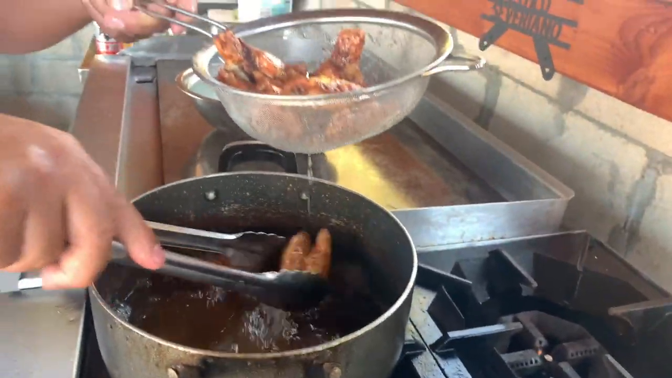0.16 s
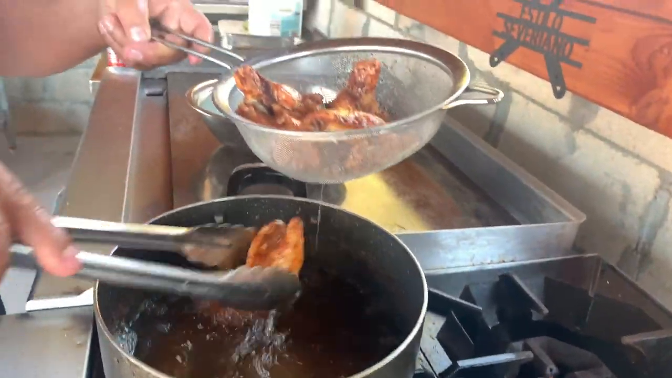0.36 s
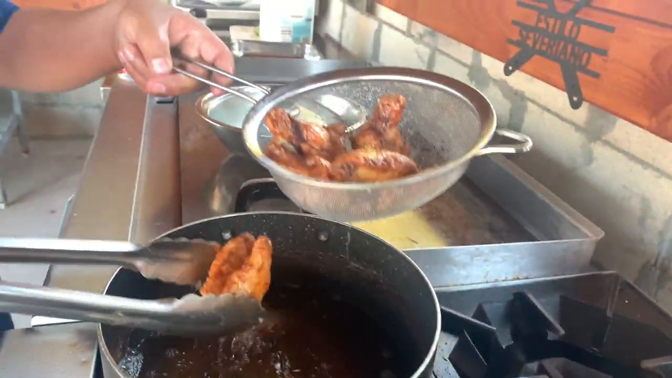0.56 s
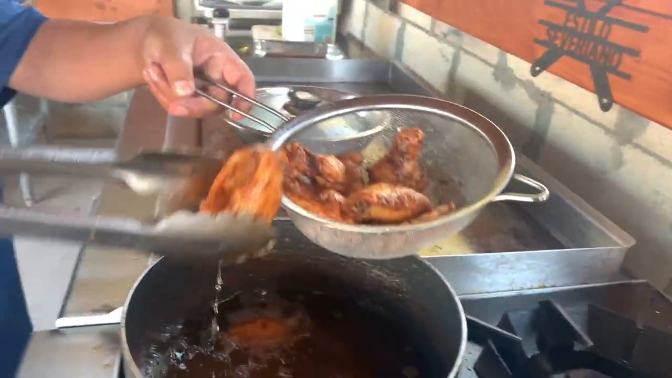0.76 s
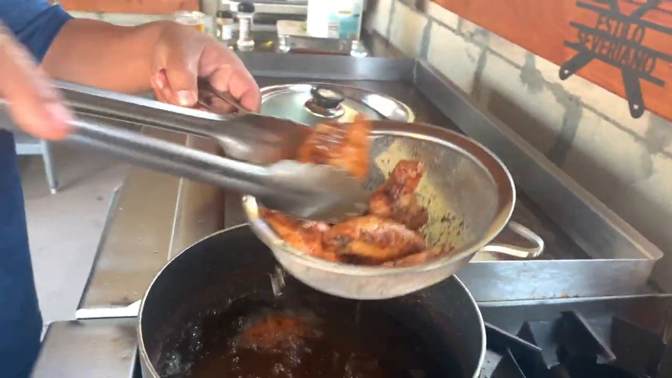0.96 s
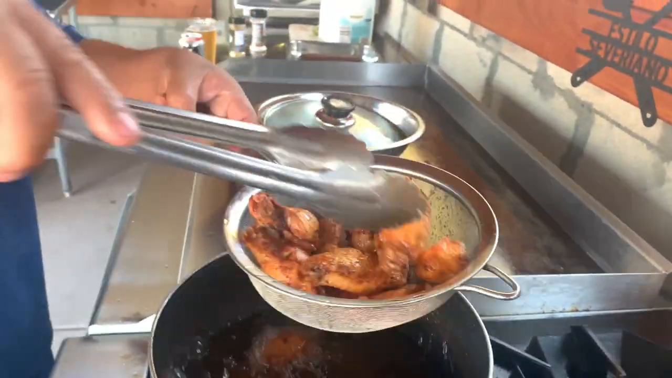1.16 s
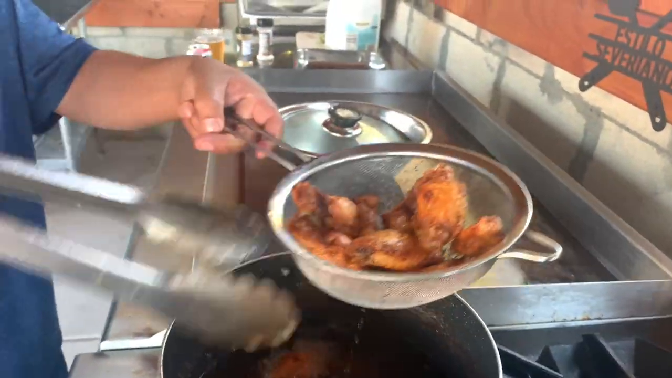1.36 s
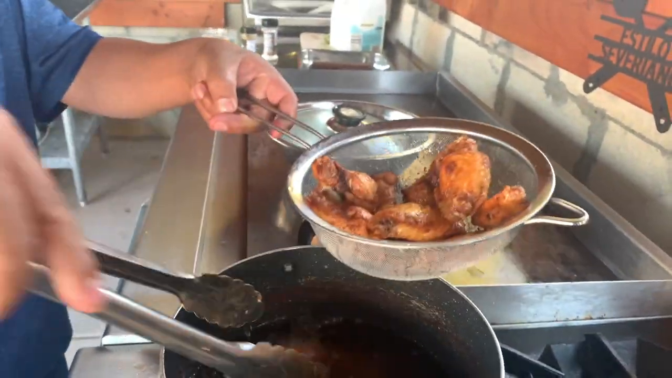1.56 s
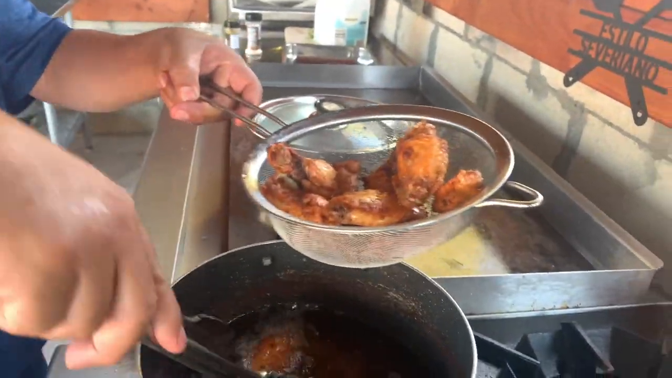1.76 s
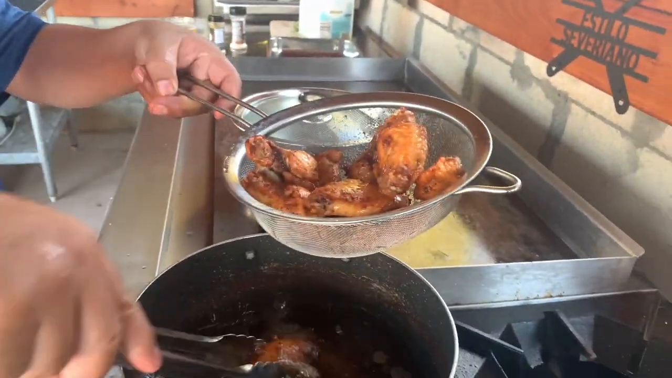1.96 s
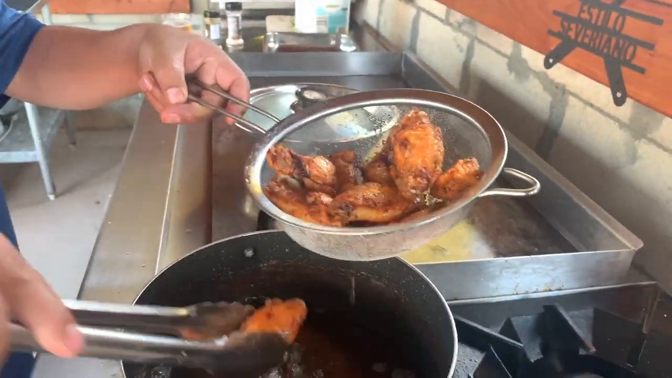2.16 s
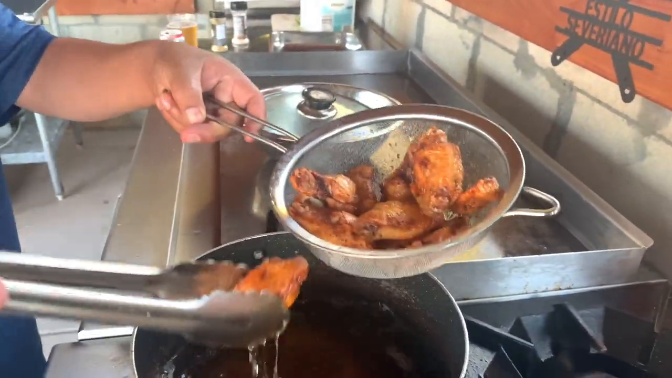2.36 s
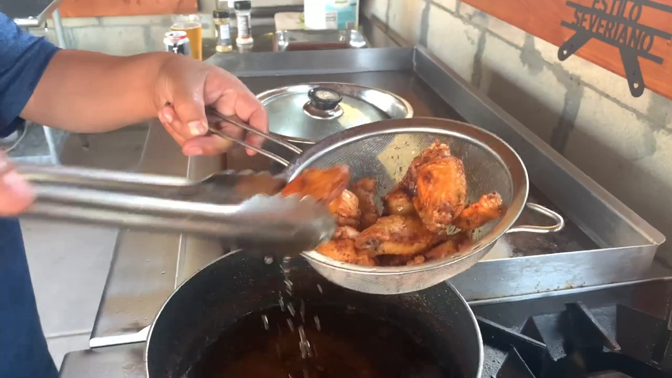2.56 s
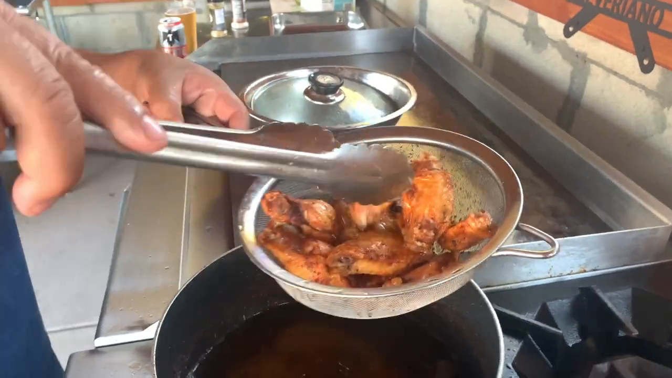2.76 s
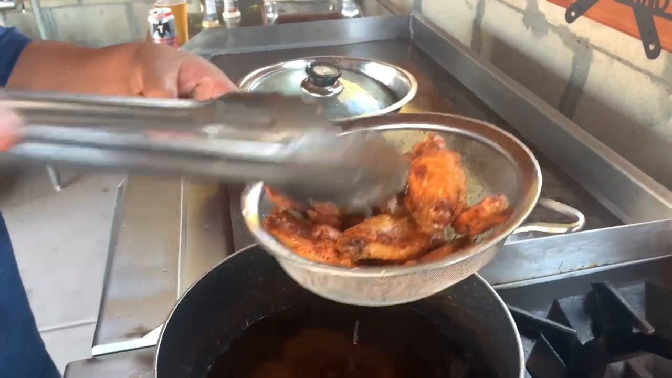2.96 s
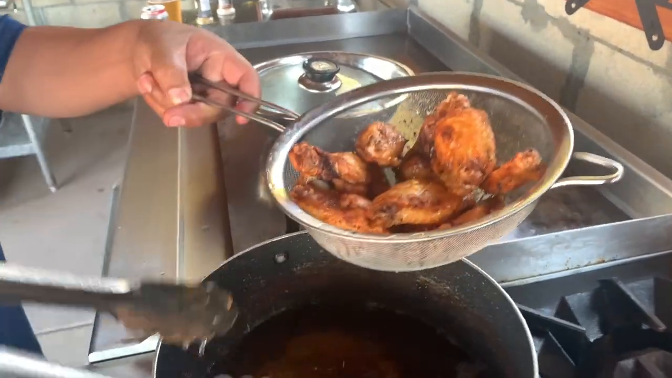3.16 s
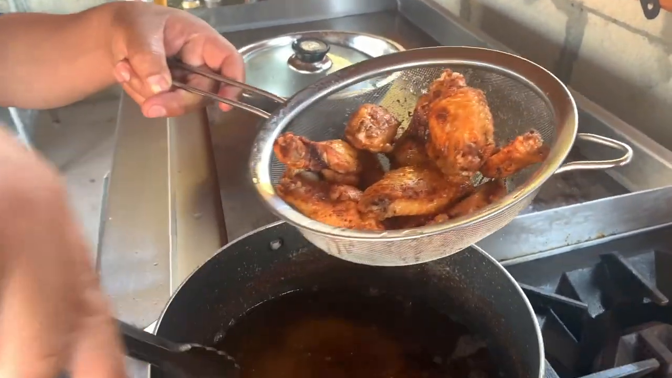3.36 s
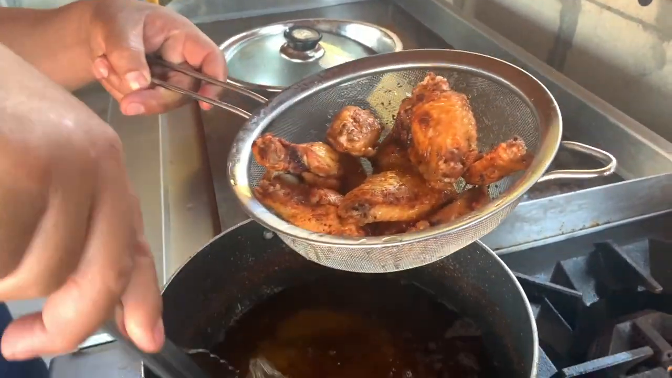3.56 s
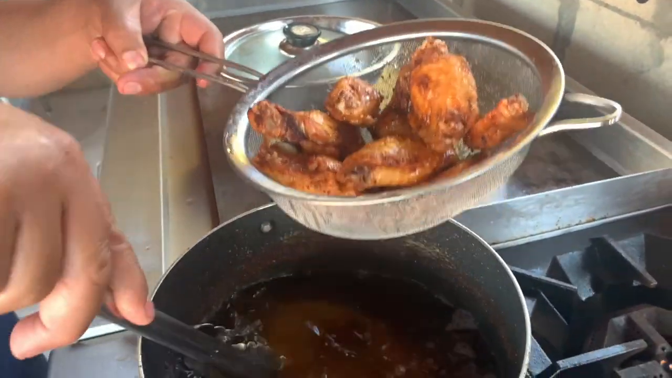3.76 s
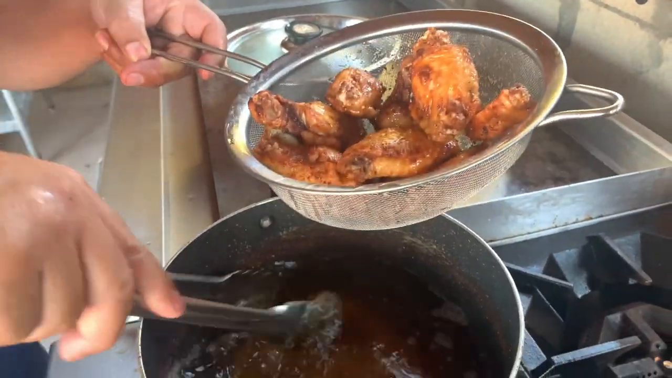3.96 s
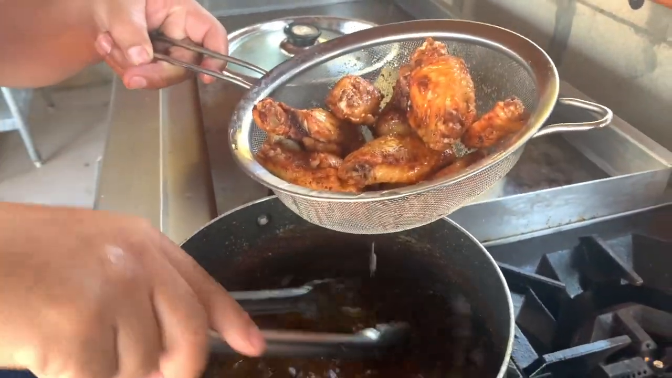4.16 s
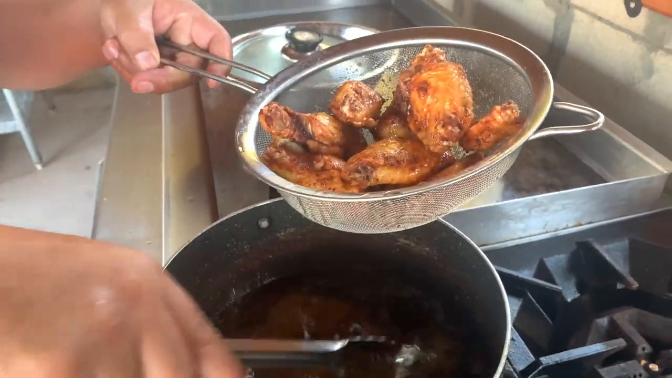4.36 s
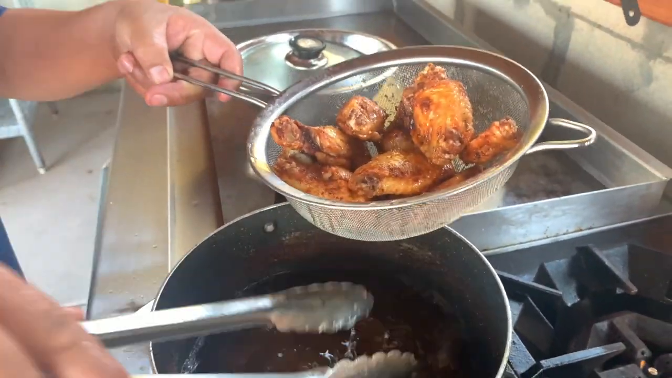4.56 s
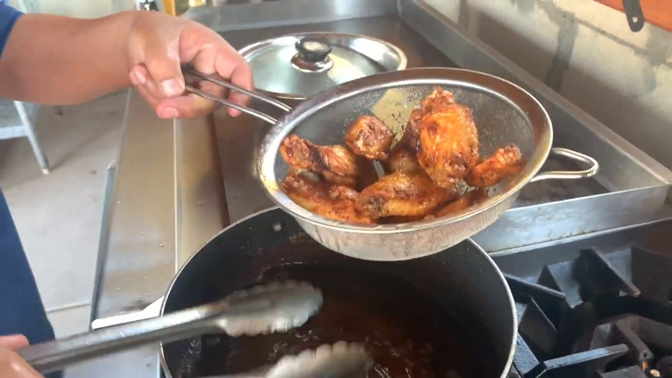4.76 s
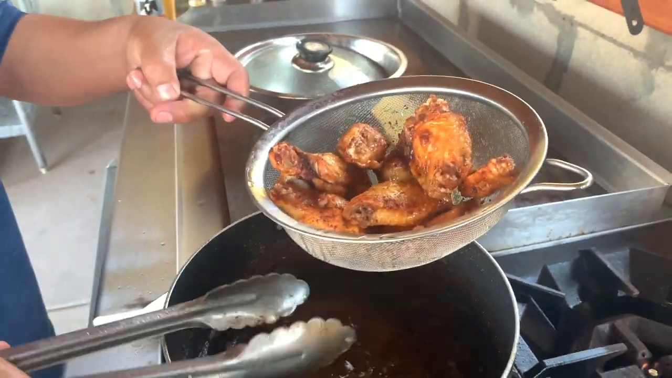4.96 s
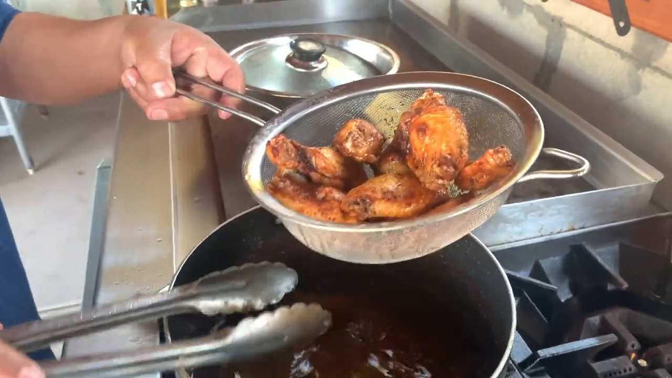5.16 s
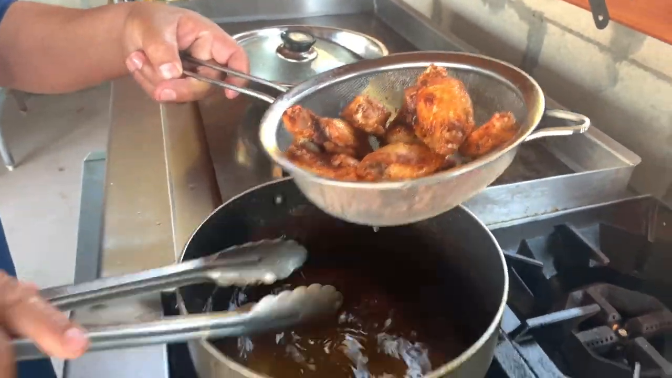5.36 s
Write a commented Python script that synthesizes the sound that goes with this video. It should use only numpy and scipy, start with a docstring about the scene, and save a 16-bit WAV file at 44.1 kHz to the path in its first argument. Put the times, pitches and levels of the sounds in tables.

```python
"""A dense, bright sizzle runs throughout: chicken wings fry in a pot of hot oil, close to two microphones.
Thousands of tiny steam pops a second make it, easing as wings leave; ringing bubbles boil up and plop,
noise bursts spit and squirt, and filtered noise slops. Steel tongs touch the pot as they fish wings out,
then knock on it four times: noise cracks and ringing modes that overload the microphones.
Behind the pot a kitchen fan drones: three wavering hum harmonics over a rumble of air."""
import sys
import numpy as np
from scipy import signal
from scipy.fft import rfft, irfft, next_fast_len
from scipy.io import wavfile

SR = 44100
rng = np.random.default_rng(int(sys.argv[2]) if len(sys.argv) > 2 else 0)


def unload_audio(sound):
    """Save the sound as a 16-bit wav file, at the path given as the first command line argument."""
    columns = np.transpose(np.atleast_2d(sound))
    # keep every value between -1 and 1, then stretch to whole-number steps
    steps = np.round(np.clip(columns, -1, 1) * 32767)
    wavfile.write(sys.argv[1], SR, steps.astype(np.int16))


N = 238928
TIME = np.arange(N) / SR
TAPS = 4096  # length of a path from pot to microphones, samples
LEAD = 64  # samples kept free ahead of a direct arrival
EDGE_HZ = 16050  # upper band limit

# Relative frying level, easing as wings leave: t/s, coarse sizzle level/dB, fine fizz level/dB
FRYING = [(0.0, -26, -33.5), (0.24, -23, -26.5), (0.72, -25.5, -32), (0.84, -23, -28), (1.11, -27.5, -30.5),
          (1.24, -26.5, -30), (1.56, -24, -35), (2.08, -23, -26.5), (2.21, -26, -28.5),
          (2.46, -22.5, -30.5), (2.58, -27.5, -32.5), (2.81, -24.5, -31), (3.08, -30, -33.5),
          (3.56, -22.5, -30.5), (4.18, -24, -29.5), (5.41, -28.5, -43.5)]
# Dips and small lifts of the coarse sizzle while the fizz goes on: t/s, level change/dB
LULLS = [(0.331, -8), (1.185, -1), (1.685, -7), (2.27, -2.5), (2.326, -22.5), (2.555, -5.5), (2.92, 1),
         (3.189, -2)]
# Colour of the pops in the pot: f/Hz, spectral density/dB per Hz
SIZZLE_COLOUR = [(250, -47), (380, -14.5), (480, -12.5), (700, -19), (930, -14), (1200, -4.5), (1400, -6),
                 (1800, -8), (2200, -3), (2600, -4.5), (2930, -2), (3200, -0.5), (3520, -1.5), (4300, -6),
                 (5900, -6.5), (7200, 0), (10000, -3), (12000, -5), (15700, -12)]
# Short rushes of bubbles as the oil boils up: t/s at the height, level/dB, half length/s
BOILS = [(0.56, -38, 0.03), (1.107, -30.5, 0.036), (1.44, -27.5, 0.1), (2.133, -24, 0.026),
         (2.397, -33, 0.016), (3.259, -26, 0.022), (3.749, -18, 0.017), (4.137, -21.5, 0.04),
         (4.34, -26.5, 0.036), (5.045, -24, 0.035)]
# Hollow of the pot, rung by small bubbles: f/Hz, gain/dB
HOLLOW = [(500, -16), (800, 3), (1000, -5), (1230, -1.5), (1520, -4.5), (1900, 2), (2500, -3), (3600, -4)]
# Large bubbles: t/s, peak level/dB, f/Hz, droplet spray peak level/dB, relative gulp level/dB
BUBBLES = [(0.005, -16.5, 1350, -19, -45), (0.062, -16, 860, -11.5, -28.5), (0.099, -24, 3010, -13, -43),
           (0.148, -21.5, 970, -17, -39), (0.183, -14.5, 1170, -13, -37.5), (0.212, -21, 2900, -25, -65),
           (0.307, -29, 2930, -39, -57), (0.358, -22.5, 1020, -21, -50), (0.386, -16, 1790, -17, -46),
           (0.478, -23, 1950, -28, -57), (0.533, -30, 1000, -16, -40.5), (0.559, -20, 745, -22, -54),
           (0.638, -19, 2240, -11, -37), (0.666, -13, 1180, -31, -41), (0.743, -20, 3570, -17, -56),
           (0.804, -23, 1464, -21, -43), (0.817, -12, 2110, -13, -54), (0.874, -16.5, 1150, -14, -34),
           (0.945, -13, 1250, -17, -43), (0.963, -13, 3490, -24, -55), (1.009, -15, 1115, -31, -54),
           (1.045, -20, 780, -20, -47), (1.056, -18, 1300, -30, -55), (1.080, -22.5, 654, -22, -47),
           (1.154, -20.5, 1248, -24, -53), (1.206, -21, 1220, -14.5, -43), (1.215, -13, 1248, -20, -38.5),
           (1.249, -16.5, 1720, -16, -57), (1.261, -11.5, 3270, -18, -53), (1.313, -13.5, 2800, -21, -55),
           (1.316, -12, 3470, -28, -57), (1.359, -22, 3445, -20, -52), (1.414, -9, 2930, -23, -55),
           (1.433, -24, 740, -13.5, -40), (1.465, -14, 1240, -17, -41), (1.542, -12.5, 1710, -20, -54),
           (1.574, -14.5, 1270, -19, -47), (1.726, -13.5, 745, -8, -39), (1.821, -18, 1620, -18, -47),
           (1.917, -19, 3000, -17, -58), (1.934, -20, 1205, -25, -50), (1.967, -23, 1100, -22, -52),
           (2.047, -22, 1130, -32, -52), (2.08, -22, 1090, -16.5, -42), (2.432, -17, 3000, -29, -60),
           (2.466, -24, 1248, -16, -55), (2.517, -17.5, 1593, -21, -51), (2.585, -16.5, 1800, -30, -55),
           (2.635, -19.5, 1220, -19, -60), (2.668, -19, 1722, -16.5, -60), (2.716, -23.5, 1076, -14, -52),
           (2.771, -12, 2250, -14.5, -62), (2.819, -28, 1230, -13, -58), (2.833, -12.5, 1220, -11, -63),
           (2.943, -9.5, 3150, -23, -66), (2.969, -24, 1160, -18.5, -65), (3.036, -27, 1170, -15, -58),
           (3.036, -14, 4000, -24, -62), (3.101, -13.5, 2800, -35, -64), (3.191, -15, 3800, -36, -64),
           (3.216, -15, 1135, -13, -39.5), (3.42, -20, 880, -17, -46), (3.432, -19, 764, -31, -41),
           (3.490, -9, 1270, -12, -53), (3.514, -12, 1140, -30, -50), (3.558, -8.5, 3160, -27, -57),
           (3.603, -9, 883, -10, -41), (3.689, -24, 1800, -20, -60), (3.712, -16.5, 1240, -20, -44),
           (3.792, -24, 3010, -28, -39), (3.852, -11, 1190, -25, -57), (3.867, -19, 1200, -26, -55),
           (3.939, -10.5, 1378, -11, -53), (3.965, -15.5, 1076, -34, -56), (4.036, -11.5, 2630, -20, -55),
           (4.074, -11, 1600, -21, -60), (4.154, -15, 1650, -14, -53), (4.173, -19, 1220, -20, -60),
           (4.199, -10, 1950, -14, -42), (4.215, -20, 1150, -28, -47), (4.331, -26, 2710, -18, -60),
           (4.38, -15, 1120, -17, -46), (4.415, -11.5, 2480, -30, -61), (4.567, -17.5, 1205, -21, -55),
           (4.568, -10.5, 2050, -16.5, -57), (4.697, -10.5, 2300, -22, -42), (4.977, -17, 1200, -23, -43),
           (5.138, -19, 1417, -24, -37), (5.214, -22.5, 1027, -25, -44)]
# Puff of air in the pot: f/Hz, spectral density/dB per Hz
GULP_COLOUR = [(200, -5), (330, -21), (460, -5), (560, 2.5), (800, 11.5), (1200, -43), (2500, -17)]
# Loudest spitting drops: t/s, relative level/dB, f/Hz
SPITS = [(0.034, -14, 6490), (0.224, 0, 10700), (0.726, 0, 9900), (0.841, -4, 7300), (0.898, -11, 11200),
         (0.9193, -10, 5950), (1.098, -8.5, 10400), (1.1173, -12, 10700), (1.203, -0.5, 9900),
         (1.2236, -3, 6930), (1.434, 3, 11300), (1.573, -1, 7550), (1.6376, -4.5, 9500), (1.674, 0.5, 7600),
         (1.8357, -3.5, 6760), (1.850, -4, 10300), (1.9465, 1.5, 7700), (2.007, -4, 10400),
         (2.265, -7, 11200), (2.506, -9, 10800), (2.6377, -3.5, 7700), (2.722, -8.5, 6660),
         (2.81, -10, 6460), (3.151, -11, 5900), (3.312, -9, 5200), (3.405, -16, 6960), (3.554, -10, 6800),
         (3.829, -14, 7340), (3.9263, -4, 5830), (3.942, -3, 6540), (4.0335, -4, 6550), (4.132, -1, 10000),
         (4.299, -8, 9900), (4.399, -1, 7600), (4.5444, -5.5, 9400), (4.627, -11, 9250)]
# Steam squirts, each lower, as the tongs plunge in: t/s, peak level/dB, f/Hz, 60 dB decay/s
SQUIRTS = [(1.758, -3, 5260, 0.062), (1.7755, -8, 4550, 0.013), (1.787, -6.5, 3430, 0.069)]
# Tongs against the pot: t/s, force level/dB, rattle length/s, relative boom level/dB,
# favoured f/Hz at the struck spot, ringing time as a share of the free one
KNOCKS = [(1.726, -24.5, 0.0086, -41.5, 2950, 1.1), (3.214, -21.5, 0.039, -42, 1030, 1.1),
          (3.311, -20, 0.0071, -37, 2850, 0.71), (3.488, -29, 0.0087, -39, 2300, 0.81),
          (3.851, -13, 0.0026, -31, 7400, 0.96), (3.941, -34, .004, -38.5, 1200, 1),
          (4.6381, -6.5, 0.0055, -30.5, 3241, 0.98), (4.66, -19, 0.005, -36.5, 1040, 0.48),
          (4.8457, -19, 0.0033, -53, 4490, 0.65), (4.8507, -7, 0.0057, -27.5, 4430, 0.66),
          (5.049, -21, 0.0026, -55, 5070, 0.44), (5.0544, -6, 0.012, -28, 6700, 0.6),
          (5.305, -19, 0.0035, -55, 5140, 0.57), (5.3132, -6.5, 0.013, -31, 3550, 0.74)]
# Modes of tongs and pot before each blow varies them: f/Hz, relative level/dB, free 60 dB decay/s
STEEL_MODES = [(524, -3, 0.26), (914, -3, 0.6), (1020, 7.5, 0.4), (1195, 15.5, 0.14), (1800, 4, 0.089),
               (1860, 9, 0.17), (2300, 2, 0.38), (2924, 18, 0.079), (3210, 14.5, 0.15), (3510, 5.5, 0.076),
               (3440, 15, .12), (4115, -5, 0.12), (4520, 16, 0.12), (5150, 0, 0.12), (5000, 14, 0.09),
               (5400, 9, 0.2), (5560, 10, 0.12), (5940, 11, 0.15), (6200, -27, 0.12), (6288, 12, .11),
               (6585, 6, 0.1), (6740, 11, 0.13), (7450, 6, 0.14)]
# Colour of a steel contact: f/Hz, spectral density/dB per Hz
CLACK_COLOUR = [(40, -41), (150, -10), (300, -16), (440, -5.5), (520, -2), (680, -5.5), (950, -0.5),
                (1400, -2.5), (1800, 1), (2400, -4), (5200, -0.5), (8000, -0.5), (10500, -4.5),
                (12500, -22), (15500, -17)]
# First touch of steel: f/Hz, spectral density/dB per Hz
TICK_COLOUR = [(800, -31), (2500, 1.5), (5000, -0.5), (9000, -5.5), (11500, -3), (15500, -14)]
# Boom of the full pot on its grate: f/Hz, spectral density/dB per Hz
BOOM_COLOUR = [(40, -35), (85, -16), (112, 6.5), (130, -13), (150, 6.5), (170, -25), (192, 6), (207, 0),
               (228, 4.5), (255, 0.5), (295, -6.5), (400, -6.5), (700, -33.5)]
# Tongs and wings bump the pot bottom under the oil: t/s, relative level/dB
THUDS = [(1.728, -30), (1.768, -30), (1.797, -28.5), (2.582, -41), (3.215, -36), (3.256, -39),
         (3.795, -30.5), (3.893, -31.5)]
# Dull bump through the oil: f/Hz, spectral density/dB per Hz
THUD_COLOUR = [(90, -20), (170, -4.5), (240, 1), (320, -5), (420, -9), (700, -25), (1500, -45)]
# Stirred oil slopping about in the pot: start t/s, length/s, level/dB
SLOPS = [(0.0, 2.245, -39), (2.38, 0.67, -47), (3.222, 1.08, -37), (4.15, 0.48, -40), (4.62, 1.06, -34)]
# Colour of the slopping oil: f/Hz, spectral density/dB per Hz
SLOP_COLOUR = [(170, -20), (240, 6), (280, -10.5), (330, 1.5), (385, -6), (450, -13), (550, 0.5), (630, -5),
               (750, 5.5), (1000, -29), (1500, -16)]
# Motor hum swelling and sinking: t/s, relative fundamental level/dB
FAN_HUM = [(0.0, -37.5), (0.25, -35.5), (0.7, -39), (1.0, -34), (1.3, -42.5), (1.47, -53), (1.71, -36.5),
           (1.84, -32), (2.27, -50.5), (2.45, -39), (2.62, -50.5), (2.88, -42), (3.1, -33.5), (3.35, -28.5),
           (3.58, -43), (3.78, -29), (3.97, -33), (4.07, -40), (4.26, -26.5), (4.44, -41.5), (4.55, -31),
           (5.41, -34.5)]
# Second harmonic of the hum before its waver: t/s, level/dB
FAN_OCTAVE = [(0.0, -52), (0.3, -42.5), (0.72, -52), (0.95, -39), (1.15, -50.5), (1.3, -38), (1.55, -40),
              (1.7, -56), (2.0, -51), (2.3, -73), (2.45, -58), (2.65, -42), (2.9, -59), (3.1, -45),
              (3.4, -41), (5.41, -47)]
# Moving air of the fan: f/Hz, spectral density/dB per Hz
AIR_COLOUR = [(20, -22), (35, -2.5), (55, 10.5), (80, 9), (120, 3.5), (200, -10.5), (300, -6), (600, -30),
              (1500, -56)]
# The pot at the two microphones: f/Hz, likeness 0-1, phase by which left leads/rad
MICROPHONES = [(70, 0.97, 0), (155, 0.95, 0.8), (230, 0.95, 1.9), (300, 0.9, 3.1), (385, 0.85, 4.3),
               (440, 0.5, 4.6), (480, 0.24, 0.4), (590, 0.7, 2.2), (740, 0.37, 2.7), (830, 0.54, 0.7),
               (1200, 0.92, 1.9), (1850, 0.15, 2.6), (2900, 0.66, 3.4), (4000, 0.1, 4.3), (5200, 0.3, 2.0),
               (6300, 0.6, -0.2), (8400, 0.96, -3.1), (9700, 0.7, -4.6), (11000, 0.96, -6.3),
               (12100, 0.62, -7.5), (13400, 0.95, -9.4), (15300, 0.84, -12.4)]
# Balance of the two microphones: f/Hz, left minus right level/dB
BALANCE = [(250, -11), (500, -3), (1200, -0.5), (2500, -1), (4000, -2.5), (5500, -6.5), (7200, 0.5)]

LULL_SINK_S, LULL_RETURN_S = 0.028, 0.017
POPS_PER_S, FINER_IS_DENSER = 170, .8  # pop rate at 1500 Hz, and its exponent over pitch
FLURRY_DB, FLURRY_HZ, SHARED_FLURRY_DB = 4.2, 70, 1.6
POP_ECHO_S = .03
SIMMER_DB = -9.5  # bubbling between the boils, relative to the coarse sizzle
BUBBLE_CYCLES, BUBBLE_RISE, BUBBLE_ECHO_DB = 4.0, .005, -2.5  # cycles at 1200 Hz
SMALL_RING_LONGER = .6  # exponent of the ringing cycles over pitch
SPRAY_T60_S = .1
FIZZLE_DB = -13  # relative to the coarse sizzle
SPIT_S, SPIT_OCTAVES, SPIT_ECHO_S = 0.0004, 0.41, 0.011  # level reference time, bandwidth, echo decay
SQUIRT_OCTAVES = .36
TICK_DB, RING_DB = -5, -6.3  # relative to the body of a clack
TICK_T60_S, BODY_RISE_S = 0.051, 0.0026  # the rattle lengthens the tick
FAVOUR_DB, FAVOUR_OCTAVES = 8, .04
MODE_SPREAD_DB, MODE_DETUNE = 2, .002  # random spread of level, and of pitch as a share
THUD_T60_S, THUD_RISE_S = 0.17, 0.0028
SLOP_EDGE_S, SLOP_WASH = 0.13, 0.12  # fade at each end, steady power under the glugs
GLUGS_PER_S, GLUG_S = 45, .007
FAN_HZ, FAN_WAVER_DB, FAN_WAVER_HZ = 78.2, 1.0, 4


def amp(db):
    """Decibels to gain."""
    return 10 ** (np.asarray(db) / 20)


def evened(x):
    """Scales to rms 1."""
    return x / np.sqrt(np.mean(x ** 2) + 1e-20)


def read(table, hz, axis=1):
    """One column of a table over log frequency."""
    rows = np.array(table, float)
    return np.interp(np.log(hz + 1), np.log(rows[:, 0] + 1), rows[:, axis])


def follow(table, axis=1):
    """One column of a table over time."""
    rows = np.array(table, float)
    return np.interp(TIME, rows[:, 0], rows[:, axis])


def add(mix, s, sound):
    """Mixes in a stereo sound at time s, less the lead ahead of its direct arrival."""
    part = mix[:, max(round(s * SR) - LEAD, 0):][:, :sound.shape[1]]
    part += sound[:, :part.shape[1]]


def through(x, response):
    """Convolves a mono sound with a stereo response."""
    return signal.fftconvolve(response, x[None], axes=1)


def colour(x, spectrum):
    """Filters by a smooth spectrum."""
    size = next_fast_len(x.shape[-1] + TAPS)
    gain = amp(read(spectrum, np.fft.rfftfreq(size, 1 / SR)))
    return irfft(rfft(x, size) * gain, size)[..., :x.shape[-1]]


def drift(hz):
    """Slow chance of rms 1 that turns about hz times a second."""
    knots = rng.standard_normal(2048)
    return evened(np.interp(TIME * hz, np.arange(len(knots)), knots))


def train(per_s, spread_db, largest):
    """Random clicks of either sign, most small and a few large."""
    out = np.zeros(N)
    at = np.flatnonzero(rng.random(N) < per_s / SR)
    sizes, signs = rng.exponential(1, 20000), rng.choice([-1., 1.], 20000)
    out[at] = (amp(spread_db * np.minimum(sizes, largest)) * signs)[:len(at)]
    return out


def spurts_of(clicks, decay_s):
    """Lets each click die away exponentially."""
    return signal.lfilter([1], [1, -np.exp(-1 / (decay_s * SR))], clicks)


def path(t60, directness=1):
    """From one spot in the pot to both microphones: a direct arrival plus echoes off the pot wall."""
    hz, t = np.fft.rfftfreq(TAPS, 1 / SR), np.arange(TAPS) / SR
    echoes = rng.standard_normal((2, TAPS)) * amp(-60 * t / t60)
    echoes = rfft(echoes / np.linalg.norm(echoes, axis=1, keepdims=True))
    same = np.clip(directness * read(MICROPHONES, hz), 0, .99)
    side = np.array([[.5], [-.5]])  # left, right
    direct = np.exp(1j * side * read(MICROPHONES, hz, axis=2))
    both = np.sqrt(same) * direct + np.sqrt(1 - same) * echoes
    both = both * amp(side * read(BALANCE, hz))
    fade = np.minimum(2 * (1 - t / t[-1]), 1) ** 2
    return np.roll(irfft(both), LEAD, axis=1) * fade


def ports(x):
    """A low sound reaches both microphones alike, a little apart in phase."""
    size = next_fast_len(len(x) + TAPS)
    phase = read(MICROPHONES, np.fft.rfftfreq(size, 1 / SR), axis=2)
    return irfft(rfft(x, size) * np.exp(.5j * np.array([phase, -phase])), size)[:, :len(x)]


def pop(hz, octaves, t60):
    """A burst of steam: one click, strongest around hz, heard from its own spot."""
    distance = np.log2((np.fft.rfftfreq(TAPS, 1 / SR) + 1) / hz) / octaves
    return irfft(rfft(path(t60)) * np.exp(-distance ** 2 / 2))


def blip(hz, cycles, rise):
    """A bubble rings, decaying over some cycles while its pitch rises."""
    turns = hz * np.arange(TAPS // 2) / SR
    age = np.minimum(turns / cycles, 5)
    tone = np.sin(2 * np.pi * np.cumsum(1 + rise * age) * hz / SR)
    return tone * np.exp(-turns / cycles) * (1 - np.exp(-turns))


def coarse_db():
    """Relative level of the coarse sizzle: the frying plus its lulls, which sink and return quickly."""
    lulls_db = 0
    for s, db in LULLS:
        pace = np.where(TIME < s, LULL_SINK_S, LULL_RETURN_S)
        lulls_db = lulls_db + db * np.exp(-abs(TIME - s) / pace)
    return follow(FRYING) + lulls_db


def sizzle(count=28):
    """Thousands of pops a second in shared and separate flurries; the finest pitches follow the fizz."""
    body_db, fine_db = coarse_db(), follow(FRYING, axis=2)
    out, shared_db = np.zeros((2, N)), SHARED_FLURRY_DB * drift(FLURRY_HZ)
    for hz in np.geomspace(380, 16000, count):
        fineness = np.clip(2 * np.log2(hz / 5800), 0, 1)
        level_db = (1 - fineness) * (body_db - 1.06) + fineness * (fine_db + 0.5)
        flurry_db = shared_db + FLURRY_DB * np.tanh(drift(FLURRY_HZ))
        per_s = min(POPS_PER_S * (hz / 1500) ** FINER_IS_DENSER, 3000)
        clicks = evened(train(per_s, spread_db=4.6, largest=2.9)) * amp(level_db + flurry_db)
        voice = pop(hz, octaves=0.28 * (hz / 3000) ** -.35, t60=POP_ECHO_S)
        out += signal.oaconvolve(clicks[None], voice, axes=1)[:, LEAD:N + LEAD]
    return amp(6.0) * colour(out, SIZZLE_COLOUR)


def simmer(count=24):
    """Steam escapes in spurts: small bubbles, louder in each spurt, ring the hollow of the pot."""
    spurts = spurts_of(abs(train(36, spread_db=2.5, largest=2.5)), 0.003)
    crowd, out = 0.8 + np.minimum(spurts, 1.2), np.zeros((2, N))
    for hz in np.geomspace(1020, 4400, count):
        voice = through(blip(hz, cycles=7.3, rise=0.057), path(0.087))
        clicks = crowd * train(34, spread_db=4.5, largest=2.64)
        out += signal.oaconvolve(clicks[None], voice, axes=1)[:, :N]
    boiling = sum(amp(db) ** 2 * np.exp(-((TIME - s) / half) ** 2) for s, db, half in BOILS)
    level = np.sqrt(amp(coarse_db() + SIMMER_DB) ** 2 + boiling)
    return evened(colour(out, HOLLOW)) * level


def bubbles():
    """Large bubbles plop where wings and tongs stir the oil, and the air in the pot gulps below them."""
    out, t = np.zeros((2, N)), np.arange(2 * TAPS) / SR
    for s, db, hz, spray_db, gulp_db in BUBBLES:
        tone = blip(hz, BUBBLE_CYCLES * (hz / 1200) ** SMALL_RING_LONGER, BUBBLE_RISE)
        echo = through(tone, path(0.14, directness=0))
        direct = ports(np.pad(tone, (LEAD, echo.shape[1] - len(tone) - LEAD)))
        plop = evened(direct) + amp(BUBBLE_ECHO_DB) * evened(echo)
        add(out, s, amp(db) * plop / abs(plop).max())
        # the torn film scatters droplets
        spray = rng.standard_normal(TAPS) * amp(-60 * t[:TAPS] / SPRAY_T60_S)
        spray = through(spray, pop(1800, octaves=0.75, t60=0.068))
        add(out, s, amp(spray_db) * spray / abs(spray).max())
        puff = evened(colour(rng.standard_normal(len(t)), GULP_COLOUR)) * amp(-60 * t / 0.072)
        hollow = amp(-9.5) * np.sin(2 * np.pi * 385 * t) * amp(-60 * t / 0.25)
        gulp = (puff + hollow) * (1 - np.exp(-t / 0.0012))
        add(out, s, amp(gulp_db + 13.0) * ports(gulp))
    return out


def fizzle(count=14):
    """Single small bubbles burst at the surface and stand out of the sizzle, on a ladder of pitches."""
    out = np.zeros((2, N))
    for hz in np.geomspace(1700, 7200, count):
        voice = through(blip(hz, cycles=2.5, rise=0.04), path(0.017))
        clicks = train(7, spread_db=4.0, largest=2.5)
        out += signal.oaconvolve(clicks[None], voice, axes=1)[:, :N]
    return amp(coarse_db() + FIZZLE_DB) * evened(out)


def spits():
    """Water drops flash to steam with a bright snap of noise and a weaker, longer tail."""
    out = np.zeros((2, N))
    t = np.arange(TAPS // 8) / SR
    for s, db, hz in SPITS:
        burst = rng.standard_normal(len(t)) * (amp(-60 * t / 0.003) + amp(-15 - 60 * t / 0.018))
        snap = through(burst, pop(hz, SPIT_OCTAVES, SPIT_ECHO_S))
        strength = np.sqrt(np.sum(snap ** 2) / (SPIT_S * SR))
        add(out, s + .0006, amp(db - 0.5) * snap / strength)
    return out


def squirts():
    """Steam forced out of the crust chirps in a narrow band of decaying noise."""
    out, t = np.zeros((2, N)), np.arange(TAPS) / SR
    for s, db, hz, t60 in SQUIRTS:
        jet = rng.standard_normal(TAPS) * amp(-60 * t / t60)
        chirp = through(jet, pop(hz, octaves=SQUIRT_OCTAVES, t60=0.021))
        add(out, s, amp(db) * chirp / abs(chirp).max())
    return out


def tongs():
    """Each contact of the tongs clacks and sets the heavy pot booming."""
    out, t = np.zeros((2, N)), np.arange(SR) / SR
    for s, force_db, rattle, boom_db, favoured_hz, ringing in KNOCKS:
        add(out, s, amp(force_db) * clack(rattle, favoured_hz, ringing))
        swell = amp(-60 * t / 1.0) * (1 - np.exp(-t / 0.055))
        boom = evened(colour(rng.standard_normal(SR), BOOM_COLOUR)) * swell
        add(out, s, amp(boom_db + 8.5) * ports(boom))
    return out


def clack(rattle, favoured_hz, ringing):
    """Steel chatters on steel: a bright tick, a crack at each contact, and modes that vary by blow."""
    t = np.arange(SR // 4) / SR
    contacts = chatter(rattle, len(t))
    # each contact cracks with a short and a longer decay
    decay = amp(-60 * t / (0.044 * ringing)) + amp(1 - 60 * t / (0.084 * ringing))
    power = signal.fftconvolve(contacts, decay ** 2)[:len(t)]
    crack = rng.standard_normal(len(t)) * np.sqrt(abs(power)) * (1 - np.exp(-t / BODY_RISE_S))
    body = through(crack, path(0.12 * ringing, directness=1.0))[:, :len(t)]
    touch = rng.standard_normal(len(t)) * amp(-60 * t / (TICK_T60_S + rattle))
    tick = through(touch, path(0.025))[:, :len(t)]
    sound = evened(colour(body, CLACK_COLOUR)) + amp(TICK_DB) * evened(colour(tick, TICK_COLOUR))
    sound = sound + amp(RING_DB) * steel_ring(contacts, favoured_hz, ringing, t)
    return sound / np.sqrt(np.sum(sound ** 2) / (0.075 * SR))


def chatter(rattle, size_n, count=5):
    """Contact strengths: a first touch, quick contacts within the rattle and late bounces after it."""
    contacts = np.zeros(size_n)
    contacts[0] = 0.7
    for k, (when, size, late) in enumerate(rng.random((count, 3))):
        quick_at = int(np.clip(rattle * SR * (k + when) / count, 1, TAPS))
        bounce_at = int(np.clip((rattle + .04 * late) * SR, 1, TAPS))
        contacts[quick_at] += 0.055 + size
        contacts[bounce_at] += 0.1 * size * (1 - late)
    return contacts


def steel_ring(contacts, favoured_hz, ringing, t):
    """The contacts feed energy into decaying modes, lifted near the pitch the struck spot favours."""
    hz, db, t60 = np.array(STEEL_MODES, float).T[:, :, None]
    nearness = np.exp(-(np.log2(hz / favoured_hz) / FAVOUR_OCTAVES) ** 2)
    db = db + FAVOUR_DB * nearness + MODE_SPREAD_DB * rng.standard_normal(hz.shape)
    hz = hz * (1 + MODE_DETUNE * rng.standard_normal(hz.shape))  # the grip shifts each mode a little
    decay = amp(db - 60 * t / (t60 * ringing)) ** 2
    energy = signal.fftconvolve(decay, np.roll(contacts, LEAD)[None], axes=1)[:, :len(t)]
    tones = np.sin(2 * np.pi * (hz * t + rng.random((2, len(hz), 1))))
    return evened((np.sqrt(abs(energy)) * tones).sum(1))


def thuds():
    """Bumps on the pot bottom, muffled by the oil: dull decaying noise."""
    out, t = np.zeros((2, N)), np.arange(2 * TAPS) / SR
    for s, db in THUDS:
        dull = evened(colour(rng.standard_normal(len(t)), THUD_COLOUR))
        shape = amp(-60 * t / THUD_T60_S) * (1 - np.exp(-t / THUD_RISE_S))
        add(out, s, amp(db + 3) * ports(dull * shape))
    return out


def slop():
    """Stirred oil slops against the pot wall in quick low glugs of noise."""
    stirred = 0
    for s, length, db in SLOPS:
        edges = np.minimum(TIME - s, s + length - TIME) / SLOP_EDGE_S
        stirred = stirred + amp(db) * np.clip(edges, 0, 1)
    wash = ports(rng.standard_normal(N)) + 0.44 * rng.standard_normal((2, N))
    glugs = spurts_of(train(GLUGS_PER_S, spread_db=3, largest=2) ** 2, GLUG_S)
    return evened(colour(wash, SLOP_COLOUR)) * stirred * evened(np.sqrt(SLOP_WASH + glugs))


def fan():
    """A wavering motor hum of three harmonics over the rumble of moving air."""
    turns = 2 * np.pi * np.cumsum(FAN_HZ * (1 + 0.00492 * drift(4.3))) / SR
    first_db = follow(FAN_HUM) + 0.6 + FAN_WAVER_DB * drift(FAN_WAVER_HZ)
    second_db = follow(FAN_OCTAVE) + FAN_WAVER_DB * drift(FAN_WAVER_HZ)
    third_db = -56.0 + 2.1 * drift(3.9)
    hum = amp(first_db) * np.sin(turns)
    hum += amp(second_db) * np.sin(2 * turns)
    hum += amp(third_db) * np.sin(3 * turns)
    air = ports(rng.standard_normal(N)) + 0.4 * rng.standard_normal((2, N))
    air_db = -31.5 + 0.31 * follow(FAN_HUM)  # the air swells less than the hum
    return ports(hum) + amp(air_db) * evened(colour(air, AIR_COLOUR))


def scene():
    """Oil, tongs and fan together."""
    oil = sizzle() + simmer() + bubbles() + fizzle() + spits() + squirts()
    return oil + tongs() + thuds() + slop() + fan()


def record(dry):
    """The microphones overload smoothly on the loudest peaks; then the band limit."""
    clipped = dry / (1 + dry ** 8) ** (1 / 8)
    lowpass = signal.firwin(511, EDGE_HZ, window=("kaiser", 8), fs=SR)
    return signal.oaconvolve(clipped, lowpass[None], "same")


dry = scene()
out = record(dry)
unload_audio(out)
```